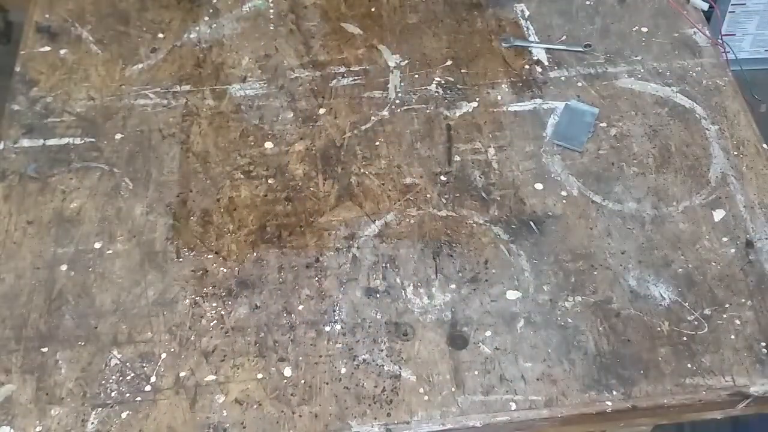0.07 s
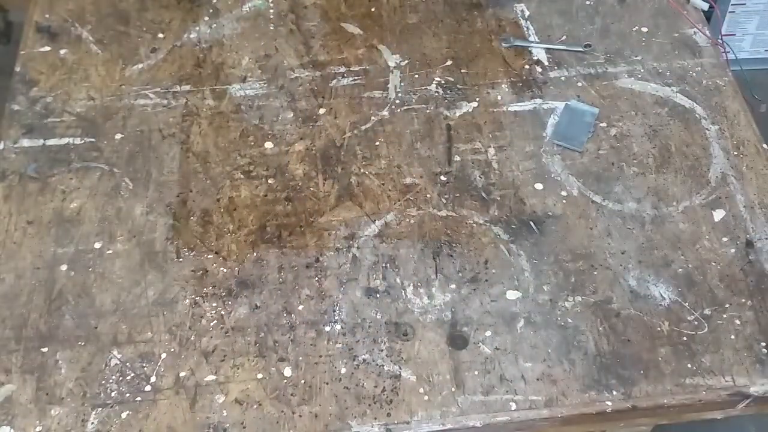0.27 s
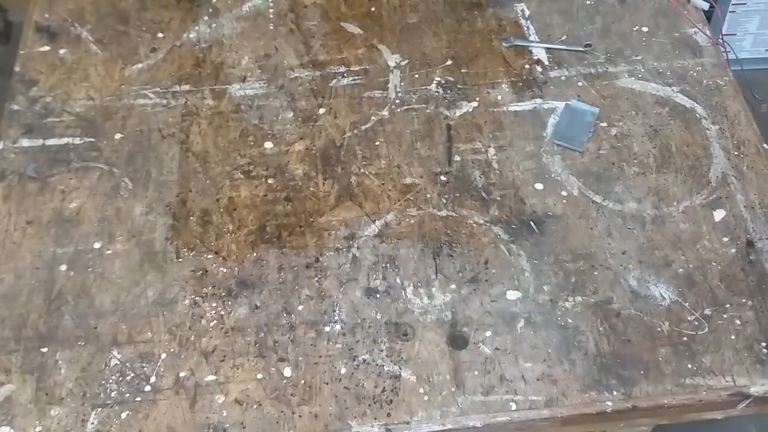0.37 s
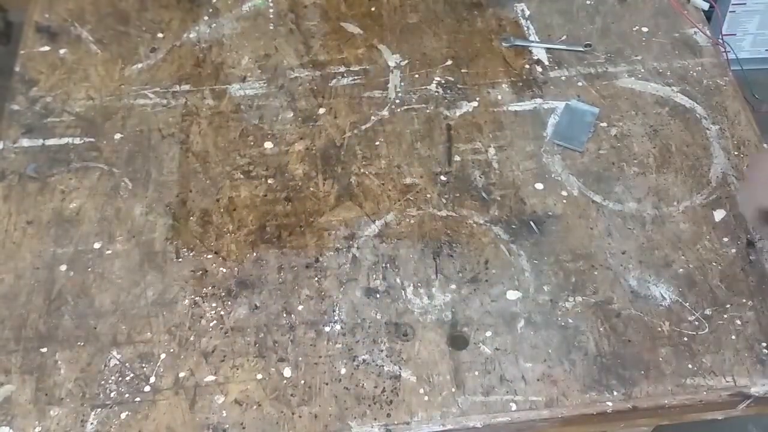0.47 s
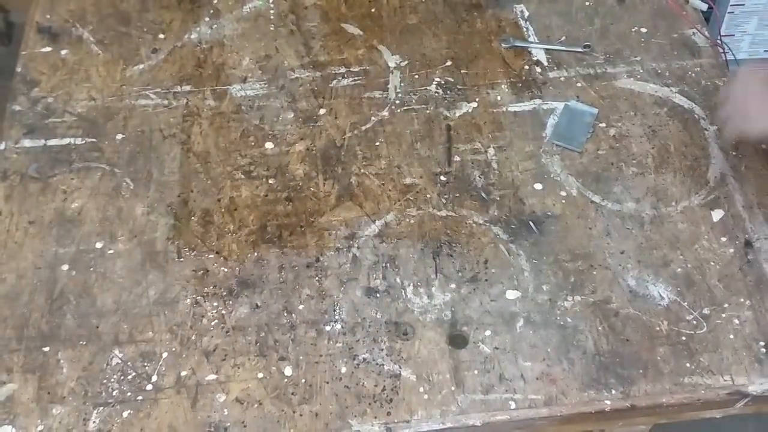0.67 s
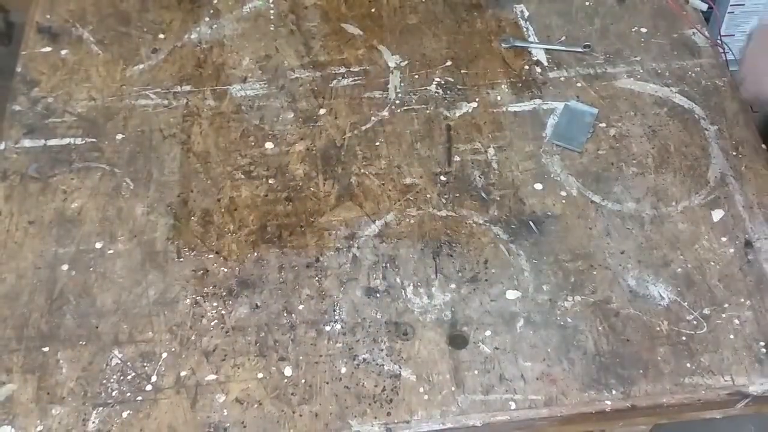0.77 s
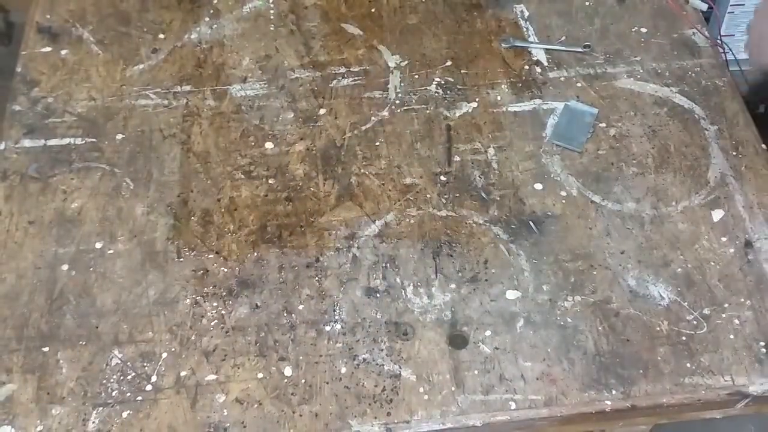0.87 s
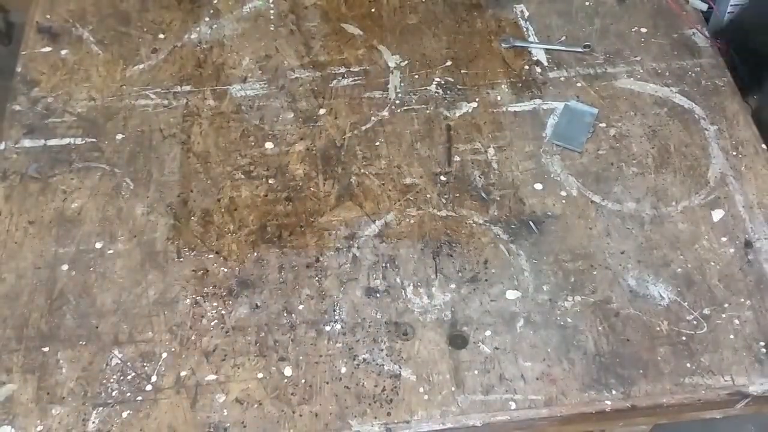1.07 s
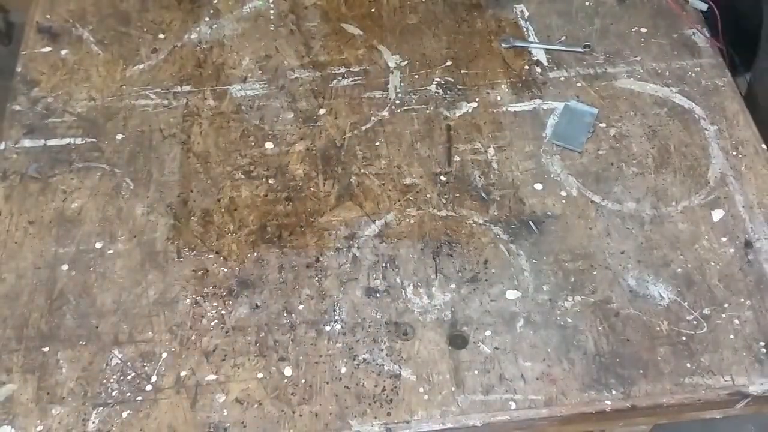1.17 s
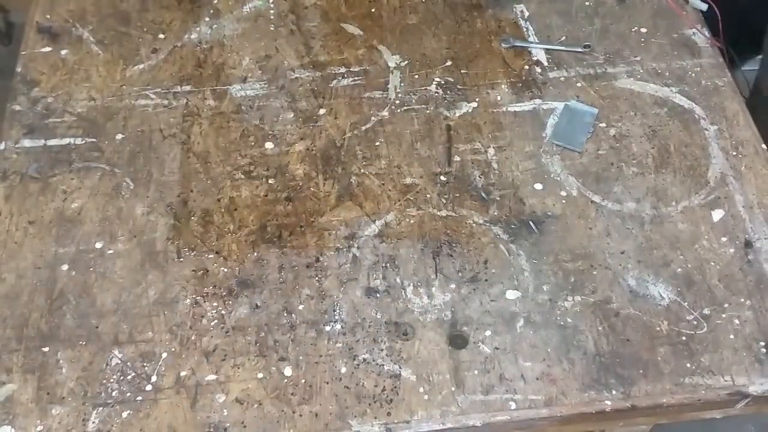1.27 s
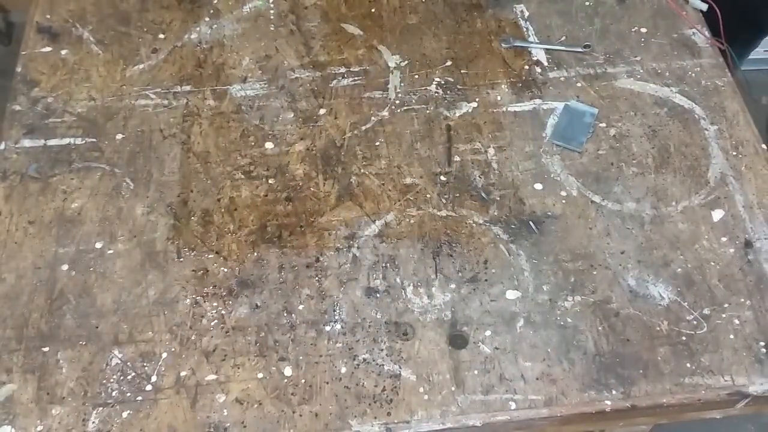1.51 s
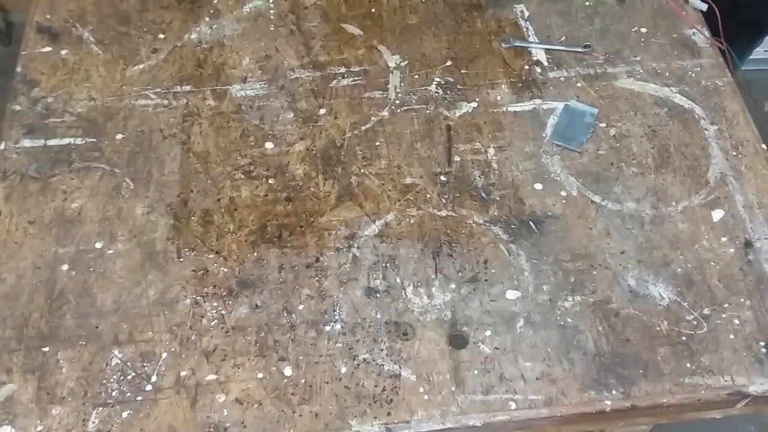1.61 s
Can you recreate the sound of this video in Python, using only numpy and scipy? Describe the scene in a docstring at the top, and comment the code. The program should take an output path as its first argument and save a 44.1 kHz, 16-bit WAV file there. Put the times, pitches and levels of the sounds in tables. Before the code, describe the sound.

A loud thud and ringing clatter on a wooden workbench, settling in softer knocks.

```python
"""A light tap sounds over faint room air, then a heavy object bangs down at the edge of a wooden
workbench in a small, live workshop. It lands with a thud and a hard clatter, rocks twice with a
bright ring and settles in softer knocks; a faint rustle and light taps follow. Each impact excites
resonances of object, bench and room, which decay exponentially: sparse modes as sines, dense ones
as noise. The microphone's two ports hear the bass alike and the treble apart."""
import sys
import numpy as np
from scipy import signal
from scipy.io import wavfile
from scipy.ndimage import uniform_filter1d

SR = 44100
rng = np.random.default_rng(int(sys.argv[2]) if len(sys.argv) > 2 else 0)


def master_out(mix):
    """Clip the mix to full scale and print it as 16-bit PCM to the path in sys.argv[1]."""
    frames = np.transpose(np.atleast_2d(mix))
    ceiling = np.clip(frames, -1, 1)
    pcm = np.round(ceiling * 32767).astype(np.int16)
    wavfile.write(sys.argv[1], SR, pcm)


N = 72765
TIME = np.arange(N) / SR
BUILD_S, BASS_BUILD_S, MODE_BUILD_S = .0044, .0095, .004   # rise time constants


def from_db(db):
    """Amplitude ratio of a level in decibels."""
    return 10 ** (np.asarray(db) / 20)


def at_hz(curve, hz):
    """Interpolation on a logarithmic frequency axis."""
    frequencies, values = np.transpose(curve)
    return np.interp(np.log(hz), np.log(frequencies), values)


# Coherence between the ports: frequency_hz, coherence (limited to 0..1 in use)
PORT_COHERENCE = [(60, 0.7), (170, 3.5), (400, 0.7), (700, 0.25), (1200, 0.5), (1800, -1.4), (15000, 1.5)]

def noise_bands(spectrum):
    """Partial coherence: yields (hz, stereo noise) by quarter octaves, with a total rms of 1."""
    edges = np.geomspace(28, 17000, 38)
    centres = np.sqrt(edges[1:] * edges[:-1])
    gains = from_db(at_hz(spectrum, centres)) * np.sqrt(np.diff(edges))
    gains /= np.linalg.norm(gains)
    white = rng.standard_normal((2, 2, N))
    for k, hz in enumerate(centres):
        band = signal.butter(2, edges[k:k + 2], "band", fs=SR, output="sos")
        noise = signal.sosfilt(band, white[k % 2])   # neighbouring bands are independent
        mid, side = noise / noise.std()
        coherence = np.clip(at_hz(PORT_COHERENCE, hz), 0, 1)
        common = np.sqrt((1 + coherence) / 2) * mid
        opposed = np.sqrt((1 - coherence) / 2) * side * [[1], [-1]]
        yield hz, gains[k] * (common + opposed)


# Spectrum of the quiet workshop: frequency_hz, density_db
AIR_SPECTRUM = [(30, -6), (80, -0.5), (150, -7.5), (300, -7.5), (700, -5), (1400, -6.5), (2250, 0),
                (3500, -14), (6000, -23), (15000, -21.5)]
# Level of the room air: time_s, level_db
AIR_FADE = [(0, -62.5), (.2, -65), (.4, -67), (1.3, -71), (1.48, -74.5), (1.65, -75)]

def room_air():
    """Ambient noise: a broadband floor of constant spectrum whose level slowly falls."""
    air = sum(noise for _, noise in noise_bands(AIR_SPECTRUM))
    return air * from_db(np.interp(TIME, *np.transpose(AIR_FADE)))


# Balance of the ports: frequency_hz, left_minus_right_db
PORT_BALANCE = [(150, -0.5), (500, 0), (1100, 3), (1600, 4), (2450, -3), (3100, 6.5), (3900, 11),
                (5300, 2.5), (8500, 5.5), (12000, -4)]

def pan(hz):
    """Interchannel level difference: left and right gains at one frequency."""
    return from_db(at_hz(PORT_BALANCE, hz) * np.array([[.5], [-.5]]))


def thud_share(hz, edge_hz=557):
    """Low-pass weighting: how far a frequency belongs to the thud."""
    return 1 / (1 + (hz / edge_hz) ** 3)


# Hard contacts with the bench: start_s, level_db, extra_thud_db, extra_treble_db, t60_s
IMPACTS = [(.026, -50, -27, 7.5, 0.46), (0.169, -65.5, -7.5, 20, 0.51), (0.2183, -33, -0.5, -8, .3),
           (0.2234, -9, 8, 4, 0.37), (0.245, -15.5, -9.5, 10, 0.63), (.297, -13, -1, 0, 0.69),
           (.320, -14, -17.5, -5.5, 0.78), (.392, -15.5, -15, -3, 0.51), (.440, -24, 1.5, 2.5, 0.61),
           (.503, -20, -11, 5.5, 0.34), (.617, -33.5, -4, -2.5, 0.58), (.915, -42.5, 11.5, 13.5, 0.29),
           (.925, -32, 4, -2, 0.37), (.938, -32.5, 9.5, -8.5, 0.5), (.995, -30.5, 8, -5, 0.38),
           (1.043, -31, 9.5, -16, 0.35), (1.071, -62, 2, -10, .33), (1.627, -60, -3.5, -8, 0.45)]

def impact_gains(hz, treble_edge_hz=3800):
    """Excitation spectrum: the gain with which each impact drives one frequency."""
    _, level_db, thud_db, treble_db, _ = np.transpose(IMPACTS)
    treble_share = 1 / (1 + (treble_edge_hz / hz) ** 4)
    return from_db(level_db + thud_share(hz) * thud_db + treble_share * treble_db)


def chatter(rate_hz=90, spread_db=.5):
    """Random amplitude modulation: a gain that flickers slightly."""
    flicker = uniform_filter1d(rng.standard_normal(N), int(SR / rate_hz))
    return from_db(spread_db * flicker / flicker.std())


# Dense resonances of object, bench and room: frequency_hz, density_db
CLATTER_SPECTRUM = [(35, -40), (80, -35.5), (140, -28), (200, -12), (300, -9.5), (450, -8.5), (560, -10.5),
                    (700, -6.5), (1000, -10.5), (1500, -3), (2150, 1), (3000, -7.5), (4200, -20),
                    (5500, -24.5), (7000, -38.5), (9000, -37), (11500, -47), (15500, -46.5)]
# Their decay time relative to the impact's: frequency_hz, t60_ratio
CLATTER_DECAY = [(50, 1.1), (150, 0.44), (270, 1.3), (400, 1.1), (700, 1.287), (1200, 1.162), (2200, 1.05),
                 (5000, 1), (8000, 1), (14000, 0.31)]

def clatter():
    """Modal overlap: dense resonances merge into noise that builds and decays band by band."""
    starts, *_, t60s = np.transpose(IMPACTS)
    coarse_time = TIME[::16]
    age = np.maximum(coarse_time - starts[:, None], 0)
    out = np.zeros((2, N))
    for hz, noise in noise_bands(CLATTER_SPECTRUM):
        build_s = BUILD_S + (BASS_BUILD_S - BUILD_S) * thud_share(hz)
        rise = 1 - np.exp(-age / build_s)
        decay = from_db(-60 * age / (t60s[:, None] * at_hz(CLATTER_DECAY, hz)))
        envelopes = impact_gains(hz)[:, None] * rise * decay
        total = np.linalg.norm(envelopes, axis=0)   # impacts add in power
        out += noise * pan(hz) * np.interp(TIME, coarse_time, total)
    return out * chatter()


def near_echoes(direct, count=6, delay_range_s=(.001, .007), gain=.16):
    """Early reflections: nearby tools and walls return the treble, differently to each port."""
    treble = signal.sosfilt(signal.butter(2, 1000, "high", fs=SR, output="sos"), direct)
    out = direct.copy()
    for port, delays_s in enumerate(rng.uniform(*delay_range_s, (2, count))):
        for k, lag in enumerate((delays_s * SR).astype(int)):
            out[port, lag:] += gain * (-1) ** k * treble[port, :-lag]
    return out


def damped_sine(hz, t60_s, start_s):
    """Damped oscillation: one mode swells, then falls by 60 dB in t60_s."""
    first = np.searchsorted(TIME, start_s)
    span = slice(first, first + int(t60_s * SR * 1.2))
    age = TIME[span] - start_s
    rise = 1 - np.exp(-age / MODE_BUILD_S)
    out = np.zeros(N)
    out[span] = np.sin(2 * np.pi * hz * age) * rise * from_db(-60 * age / t60_s)
    return out


def struck_modes(modes, t60_ratio, spread_db=3):
    """Modal superposition: every impact drives every mode, with some scatter in force."""
    starts, *_, t60s = np.transpose(IMPACTS)
    scatter_db = spread_db * rng.standard_normal((len(starts), len(modes)))
    out = np.zeros((2, N))
    for k, (hz, level_db) in enumerate(modes):
        gains = impact_gains(hz) * from_db(level_db + scatter_db[:, k]) * (-1) ** k
        delay_s = BASS_BUILD_S * rng.random()
        for gain, t60_s, start_s in zip(gains, t60s, starts):
            out += pan(hz) * gain * damped_sine(hz, t60_s * t60_ratio, start_s + delay_s)
    return out


# Modes of the bench top: pitch_hz, level_db
BENCH_MODES = [(178, -11.5), (221, -12.5), (269, -3.5), (308, -6), (405, -6.5), (491, -3), (606, -4),
               (700, -10), (781, -14)]

def bench_thud():
    """Free vibration of the wooden top: its low modes give each impact a thud."""
    return from_db(-10.5) * struck_modes(BENCH_MODES, t60_ratio=.81)


# Modes of the object: pitch_hz, level_db
OBJECT_MODES = [(1126, -9), (1261, -3), (1527, -6.5), (1657, -1.5), (1717, -4), (1846, -8), (2002, -5),
                (2115, -1), (2157, -12), (2339, -2.5), (2471, -7), (2648, -7), (2814, -10), (3112, -9)]

def object_ring():
    """Free vibration of the object: its high, inharmonic modes ring brightly."""
    return from_db(-13.5) * struck_modes(OBJECT_MODES, t60_ratio=.98)


def bursts(events, width_hz, build_s, t60_s, coherence):
    """Exponential decay: each event is a narrow band of noise that swells and dies away."""
    age = np.arange(SR // 2) / SR
    envelope = (1 - np.exp(-age / build_s)) * from_db(-60 * age / t60_s)
    out = np.zeros((2, N + SR))
    for start_s, level_db, hz in events:
        band = signal.butter(2, [hz - width_hz / 2, hz + width_hz / 2], "band", fs=SR, output="sos")
        noise = signal.sosfilt(band, rng.standard_normal((3, SR)))[:, -len(age):]
        noise /= noise.std()
        stereo = np.sqrt(coherence) * noise[0] + np.sqrt(1 - coherence) * noise[1:]
        first = int(start_s * SR)
        out[:, first:first + len(age)] += from_db(level_db) * envelope * stereo
    return out[:, :N]


# Low room rumble at the start, then bass booms of the bench: start_s, level_db, pitch_hz
RUMBLE_AND_BOOMS = [(.026, -76.5, 80), (.275, -40, 110.2), (.315, -51, 115), (.62, -58.5, 118),
                    (.81, -65.5, 125), (1.17, -64.5, 124)]

def rumble_and_booms():
    """Narrowband bass noise: the room rumbles faintly, then the bench booms at resonance."""
    return bursts(RUMBLE_AND_BOOMS, width_hz=37, build_s=.0069, t60_s=.55, coherence=1)


# Bright clacks at the first light tap, then as the object lands and rocks, then a faint rustle: start_s,
# level_db, pitch_hz
CLACKS_AND_RUSTLE = [(.027, -59, 1280), (.028, -50.5, 2250), (.227, -13.5, 2190), (.504, -14.5, 2224),
                     (.519, -20, 2070), (.619, -23.5, 2170), (1.325, -68.5, 2628), (1.370, -72, 2500)]

def clacks_and_rustle():
    """Band-limited transients: treble bursts sound as clacks, the two faintest as a rustle."""
    return bursts(CLACKS_AND_RUSTLE, width_hz=500, build_s=.0023, t60_s=.26, coherence=.14)


def landing_shove():
    """Impulse response: the landing shoves the whole bench into one heavily damped swing."""
    return from_db(-32.5) * damped_sine(hz=35, t60_s=.06, start_s=.224)


# Soft pushes on the bench top: start_s, level_db, pitch_hz
SOFT_NUDGES = [(0.398, -23.5, 395), (.452, -34.5, 361), (0.531, -41.5, 380), (.635, -53, 640),
               (.825, -55, 557), (.705, -55, 320), (0.754, -49, 321), (0.836, -48, 290), (0.936, -33, 612),
               (.942, -31.5, 488), (0.949, -34.5, 213), (1.005, -37.5, 213), (1.063, -39.5, 218),
               (1.170, -53.5, 267), (1.250, -53.5, 230), (1.345, -65, 261), (1.392, -66, 250)]

def soft_nudges():
    """Soft contact: a slow force excites only low resonances of the bench top."""
    return bursts(SOFT_NUDGES, width_hz=90, build_s=.0069, t60_s=.31, coherence=1)


def port_delay(sound, lag_s=.00029):
    """Arrival time difference: sound reaches the right port first, then the left."""
    left, right = sound
    late_left = np.roll(left, int(lag_s * SR)) * (TIME > lag_s)
    return np.array([late_left, right])


def scene():
    """Linear superposition: the sources add together over the room air."""
    sources = near_echoes(clatter()) + bench_thud() + object_ring()
    sources += clacks_and_rustle() + soft_nudges() + rumble_and_booms() + landing_shove()
    return port_delay(sources) + room_air()


def record(dry, ceiling=1.2, stopband_hz=16350):
    """Soft saturation rounds the highest peaks; a steep low-pass limits the bandwidth."""
    rounded = dry / (1 + (dry / ceiling) ** 4) ** .25
    low_pass = signal.cheby2(16, 70, stopband_hz, fs=SR, output="sos")
    return signal.sosfilt(low_pass, rounded)


dry = scene()
out = record(dry)
master_out(out)
```